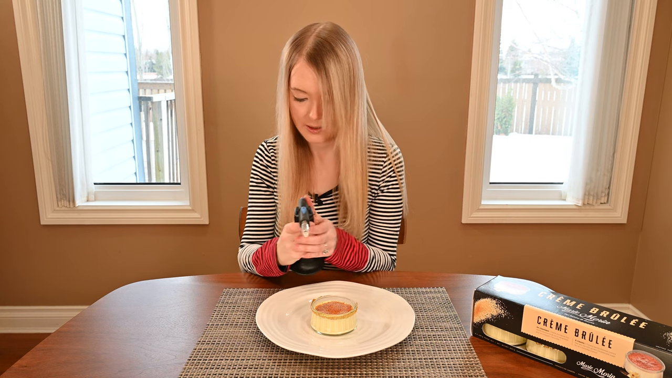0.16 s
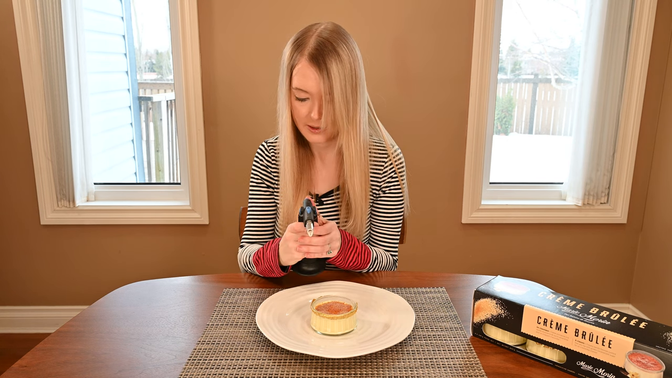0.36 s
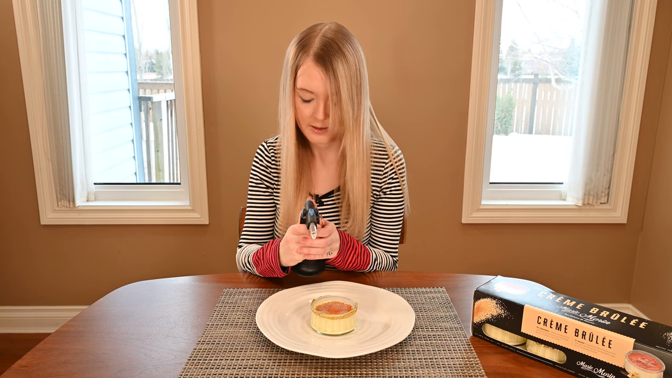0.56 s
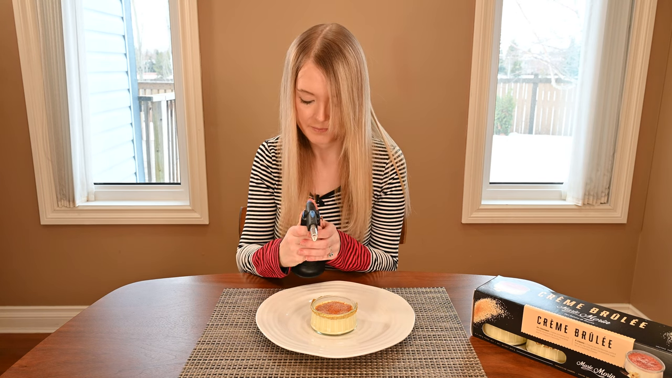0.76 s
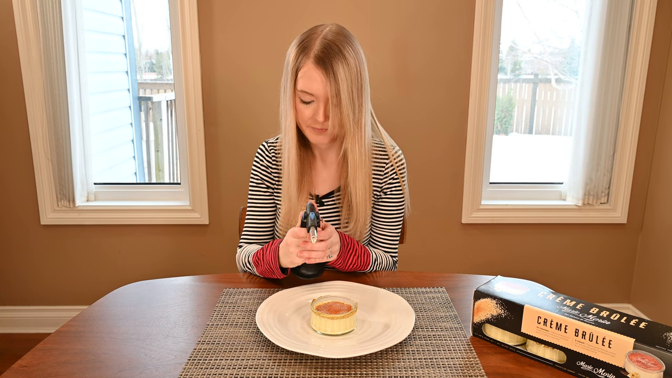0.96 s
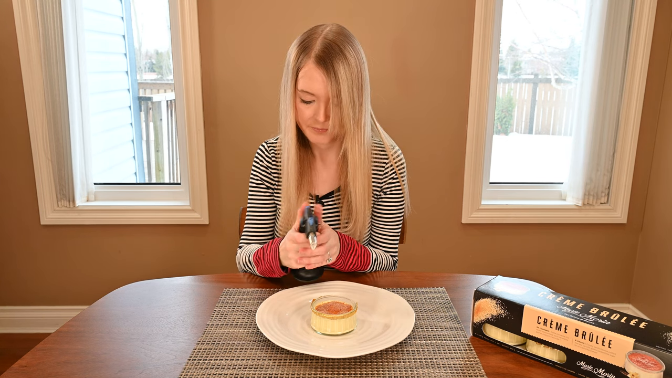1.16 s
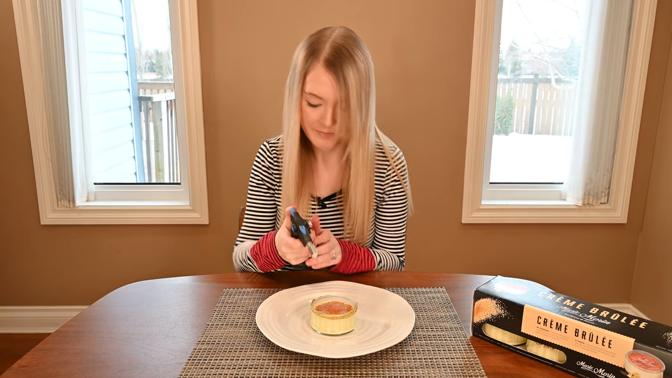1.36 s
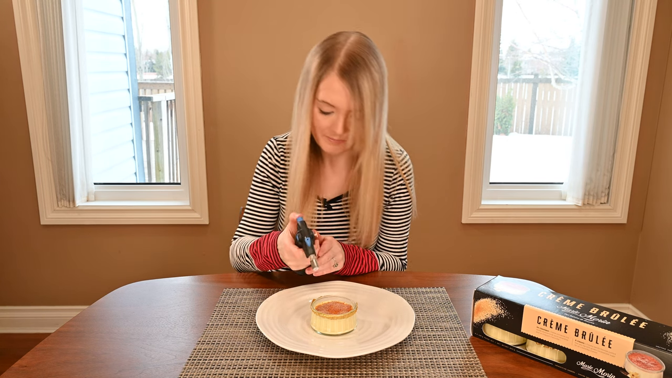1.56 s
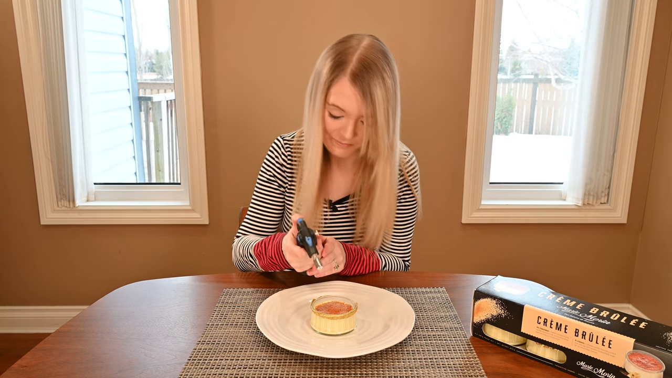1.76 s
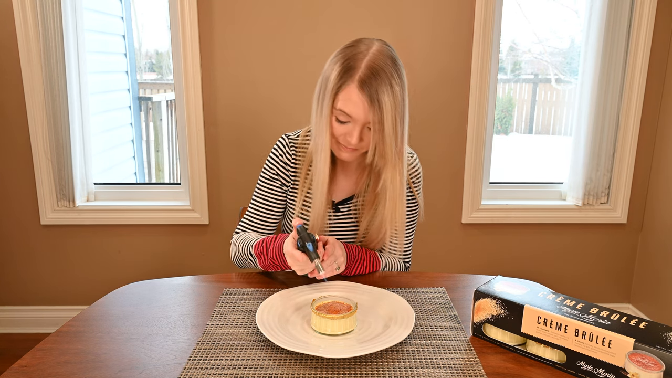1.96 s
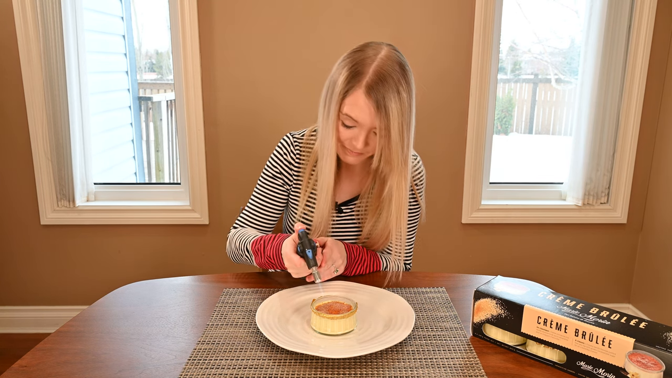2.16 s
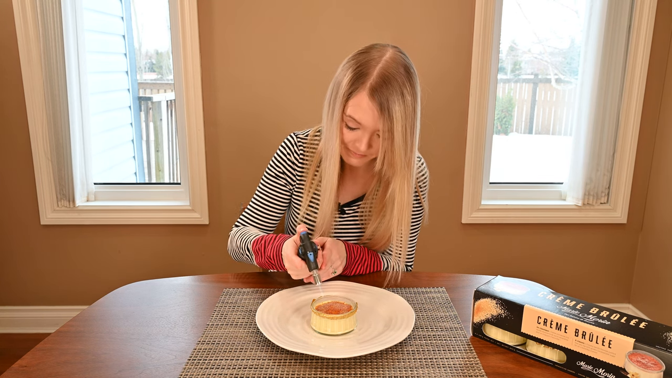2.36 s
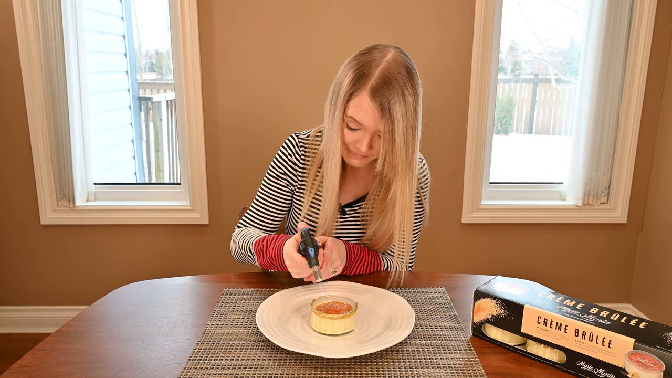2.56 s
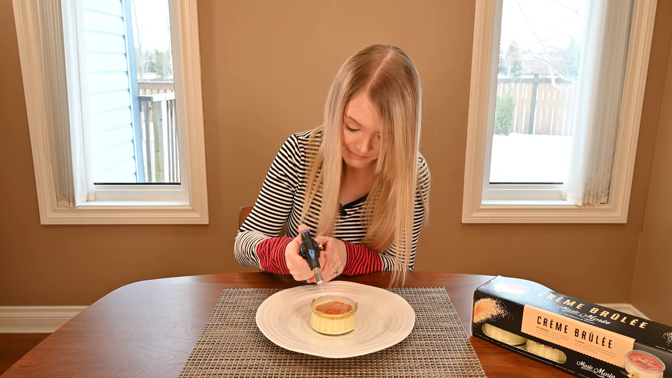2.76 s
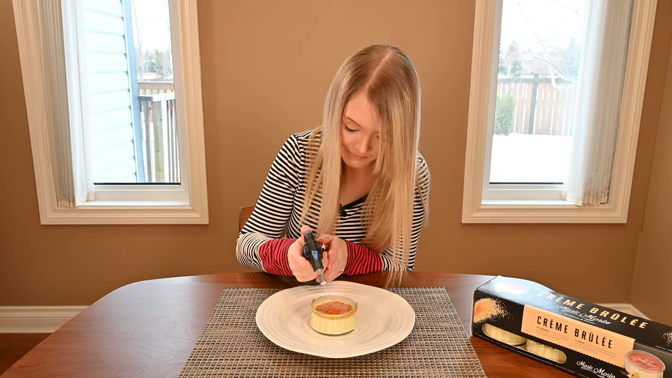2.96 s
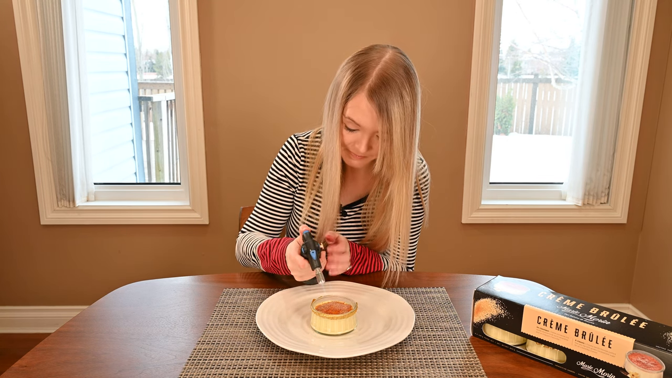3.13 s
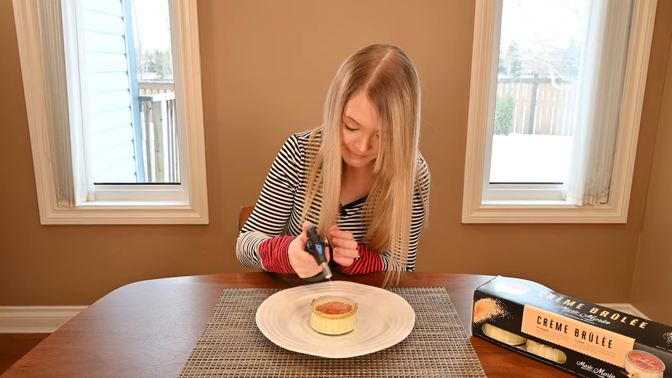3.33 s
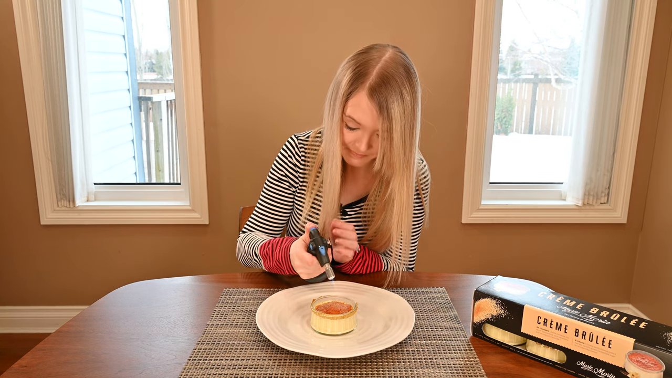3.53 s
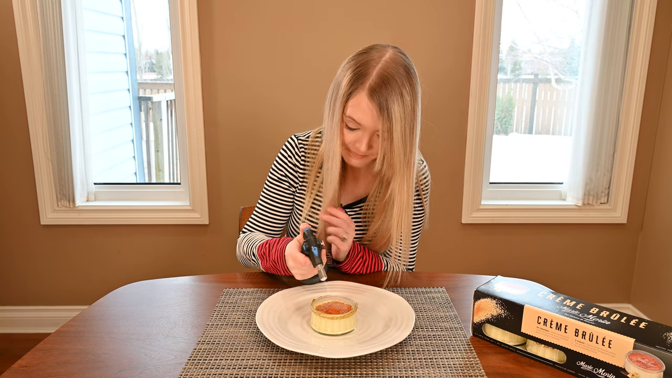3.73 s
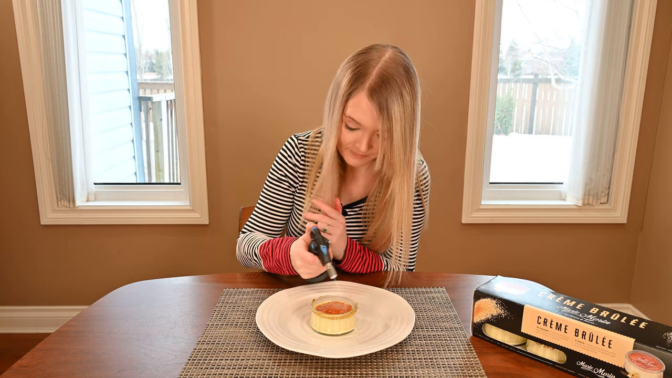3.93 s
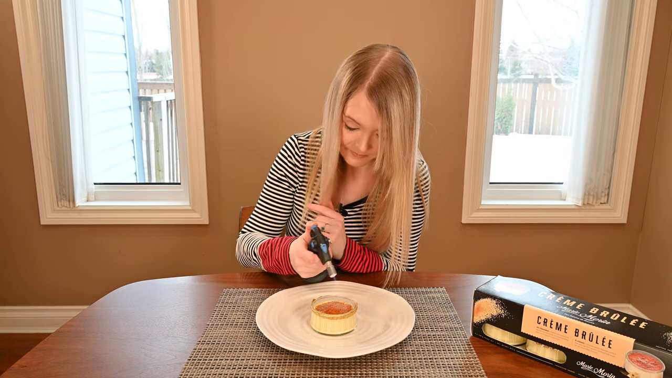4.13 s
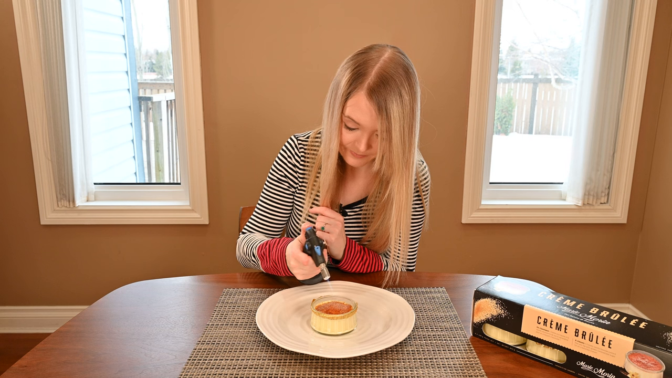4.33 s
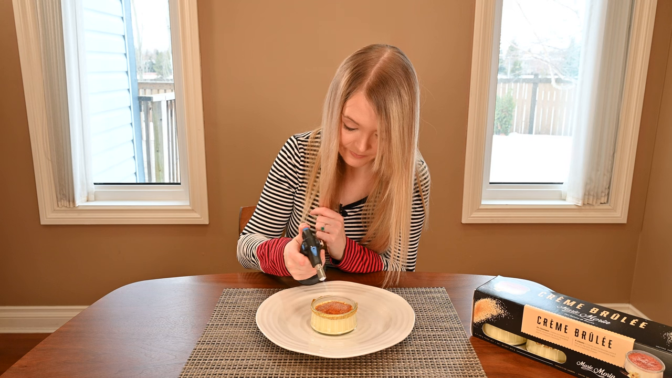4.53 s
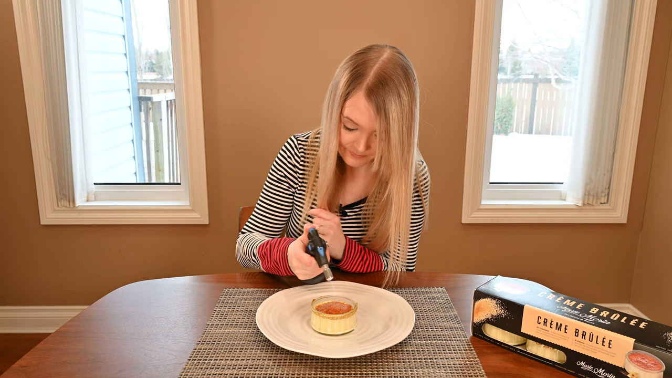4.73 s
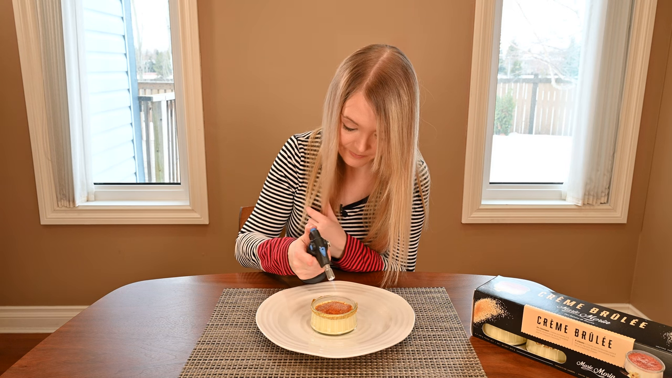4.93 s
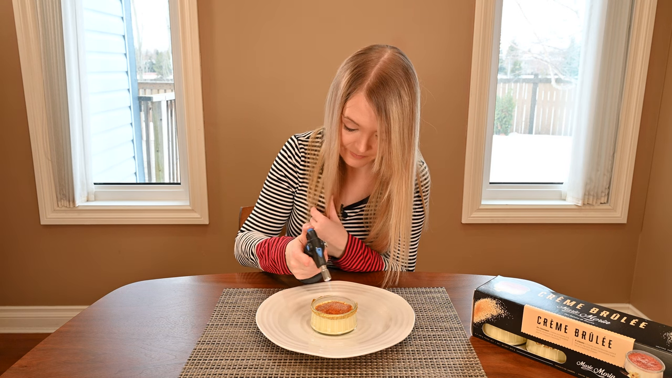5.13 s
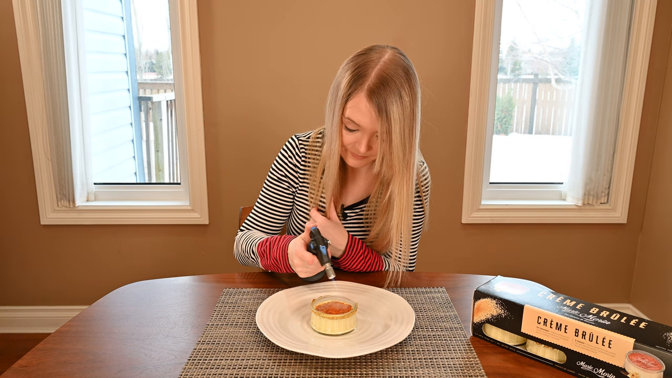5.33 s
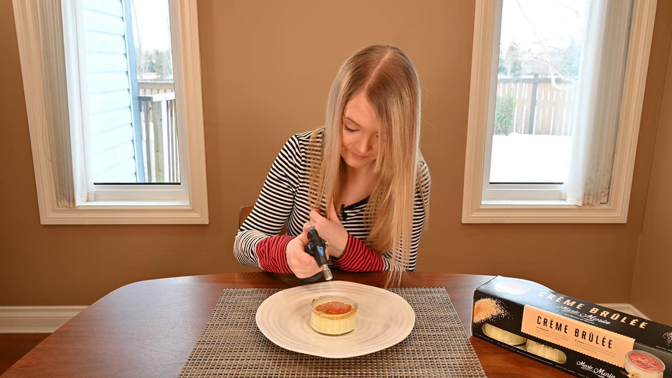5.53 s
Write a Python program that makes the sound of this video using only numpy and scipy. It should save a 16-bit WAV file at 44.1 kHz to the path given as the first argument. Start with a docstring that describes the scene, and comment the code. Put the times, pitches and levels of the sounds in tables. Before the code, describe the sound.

Faint handling, then a small gas torch hisses, clicks sharply alight and burns with a soft, steady hiss and roar.

```python
"""A hand-held butane torch is lit at a dining table, heard through a clip-on microphone.
First, over a faint room hum, fingers rub, creak and knock on the plastic body. At 1.7 s the valve opens
and gas hisses through the nozzle. The piezo igniter snaps twice and the gas catches with a low pop.
The flame then roars softly under the hiss, which shifts as the torch moves.
From 4.2 s hair brushes near the microphone, and near the end the flame flares once."""
import sys
import numpy as np
from scipy import signal
from scipy.fft import rfft, irfft
from scipy.io import wavfile
from scipy.ndimage import uniform_filter1d, map_coordinates

SR = 44100
rng = np.random.default_rng(int(sys.argv[2]) if len(sys.argv) > 2 else 0)


def materialize(psi):
    """Save the field psi as 16-bit PCM at rate SR to the path in sys.argv[1].

    A 1-D psi becomes a single channel; in a 2-D psi each row is a channel.
    """
    bounded = np.clip(np.atleast_2d(psi).T, -1, 1)
    quanta = np.round(bounded * 32767).astype(np.int16)
    wavfile.write(sys.argv[1], SR, quanta)


N = 246737
TIME, HZ = np.arange(N) / SR, np.fft.rfftfreq(N, 1 / SR)
VALVE_S, VALVE_RISE_S = 1.71, 0.076  # when the valve opens, and how long the flow takes to build
LIT_S, CATCH_S = 1.872, 0.018  # when the gas lights, and how long the flame takes to catch

# The tone colours of the noises. Each row: frequency in Hz, relative level in dB.
AIR_SPECTRUM = [(15, -51), (25, -24), (86, -20), (122, -4), (178, -15.5), (233, -11.5), (267, -12),
                (389, -13.5), (421, -22), (509, -13.5), (598, -25.5), (9550, -36.5), (15500, -39.5)]  # still air in the room
RUB_SPECTRUM = [(150, 2.5), (400, 2), (900, -1.5), (1450, 0), (2400, -11), (4500, -12.5), (9000, -16),
                (15000, -24.5)]  # sliding skin and cloth
KNOCK_SPECTRUM = [(150, -32), (450, -18.5), (900, -5.5), (1700, 1.5), (2600, -1.5), (4500, 1.5),
                  (7500, -5.5), (8900, -5.5), (11500, -10), (16000, -19)]  # short knocks and scuffs
JET_SPECTRUM = [(1500, -17.5), (2700, 4), (3300, -6), (5400, -5), (6300, 4.5), (7100, -8), (9400, -9.5),
                (12200, -5), (13200, 7), (14000, 2), (14700, 0.5), (15700, 1.5), (16300, -2)]  # the fine hiss of the gas
ROAR_SPECTRUM = [(50, -22), (80, -24), (120, -15), (200, -9), (260, -3.5), (450, 0.5), (760, -1),
                 (900, -4.5), (1100, -6.5), (1380, -8), (1680, -19), (1950, -17.5), (2300, -27.5),
                 (5000, -54)]  # the flame
CRACK_SPECTRUM = [(150, -26), (700, -8), (1200, -1), (2700, 1), (5500, 0.5), (7200, -2), (9500, 1),
                  (13000, -1), (16000, -11)]  # metal hitting metal
HAIR_SPECTRUM = [(500, -24), (2500, 1), (5000, -3), (8000, -3), (10000, 6), (12000, 0), (13500, -1),
                 (16000, -5)]  # brushing hair
# The hum of an appliance. Each row: frequency in Hz, level in dB.
HUM_TONES = [(120, -82), (242, -82.5), (388, -87.5), (511, -82)]
# Fingers and sleeves stroking the torch. Each row: start in seconds, length in seconds, level in dB.
RUB_STROKES = [(0, .16, -75.5), (0.162, 0.23, -70.5), (0.441, .13, -73.5), (1.054, 0.17, -74.5),
               (1.209, .26, -68), (1.58, .07, -75), (1.67, 0.087, -73)]
# Resonances of the plastic handle. Each row: frequency in Hz, half-width in Hz, relative level in dB.
GRIP_RESONANCES = [(1000, 200, -8), (1780, 230, 4), (2760, 130, -1), (3270, 200, -10), (4250, 130, -3),
                   (4800, 140, -2), (7000, 3700, -21), (8550, 260, -16)]
# Soft bumps of the arms. Each row: start in seconds, level in dB, fade time in seconds.
ARM_BUMPS = [(0.315, -56.5, 0.024), (4.803, -55, 0.018), (4.878, -55.5, .04), (4.968, -54.5, .015),
             (5.258, -57.5, 0.037)]
# Short knocks and scuffs: early ones on the torch, the last two hair near the microphone.
# Each row: start in seconds, level in dB, contact time in seconds, treble tilt in dB per octave.
KNOCKS_AND_SCUFFS = [(.508, -63, .004, 1), (0.647, -59.5, 0.0028, -5), (1.356, -59.5, .003, 3),
                     (1.408, -58.5, 0.0055, 7), (1.58, -60, 0.016, -7), (1.676, -60.5, .005, -2.5),
                     (1.7083, -29, 0.0018, -0.5), (1.7211, -40, 0.0018, -6), (1.8294, -23.5, .0005, 1.5),
                     (4.89, -57, .025, -7), (5.018, -48, .006, 2)]
# The nozzle tube's three rings, one list of resonances each.
# Each row: frequency in Hz, half-width in Hz, relative level in dB.
NOZZLE_RINGS = [
    [(4195, 253, -6.5), (4623, 384, 0.5), (4710, 220, -2)],
    [(7830, 680, 0)],
    [(11030, 850, 0)],
]
# The jet beams its sound, so its level changes as the torch turns.
# Each row: time in seconds, treble level in dB, level of the first ring in dB.
JET_BEAM = [(2.15, -69.5, -57), (2.34, -70.5, -57.5), (2.79, -68, -57), (3.17, -70.5, -58),
            (3.48, -73, -57.5), (3.83, -71.5, -58), (4.72, -68.5, -58), (5.21, -64, -54.5),
            (5.55, -65, -54.5)]
# The second and third rings. Each row: level in dB, share of the treble's swing that it follows.
UPPER_RING_LEVELS = [(-70, 0.49), (-72.5, 0.74)]
# Brief swells of the second ring. Each row: middle in seconds, length in seconds, lift in dB.
RING_SWELLS = [(2.45, 0.21, 6), (5.17, .18, 4)]
# The nozzle's movement. Each row: time in seconds, distance moved in metres.
NOZZLE_TRAVEL = [(1.7, 0), (2, 0.013), (2.3, 0.049), (2.9, 0.054), (3.3, 0.06), (3.9, .14), (4.3, 0.171),
                 (4.9, 0.19), (5.59, 0.14)]
# Echoes off plate, table and body. Each row: extra path in metres, its change per metre moved.
NEAR_SURFACES = [(.21, 0.826), (0.372, -0.617), (.58, 1.1), (.86, -0.876)]
# The room's standing waves. Each row: frequency in Hz, width in Hz, lift in dB.
STANDING_WAVES = [(129, 17, 4.5), (175, 23, 4), (246, 17, 4), (428, 13, 3.5), (569.5, 21, 4.5),
                  (706, 14, 5), (748, 6, 4), (1246, 12, 2)]
# Ringing tones. Each row: frequency in Hz, relative level in dB, seconds to fade by 60 dB.
LATCH_MODES = [(1370, -19.5, 0.02), (1960, -13.5, 0.013), (3410, -11, 0.016), (4100, -15, 0.025),
               (4830, 2.5, 0.0058), (5580, -3, 0.01), (8300, 0, .006), (11800, 0, 0.0038),
               (13800, -13, .006), (15400, -8.5, .006)]  # the igniter's latch
HAMMER_MODES = [(1340, -3.5, 0.018), (1970, -15.5, 0.012), (2740, -13, 0.0074), (3295, -4, 0.025),
                (3850, 1, 0.0079), (5700, 2.5, 0.0076), (7970, -8, 0.0094), (8800, 1, 0.0081),
                (9400, -5, .008), (10520, 3.5, 0.0051), (12000, 4, 0.0058), (13050, 4.5, 0.0068),
                (14700, 2, 0.0086), (16000, -7, .007)]  # its hammer striking the crystal
POP_MODES = [(134, -3, 0.043), (347, 1, 0.025), (445, -2, 0.037), (830, -11, 0.023), (1340, -2, .02)]  # the gas catching
# The igniter's echoes off table and wall. Each row: delay in seconds, relative level in dB.
CLICK_ECHOES = [(.0078, -23), (.0188, -28)]
# Brushes of hair. Each row: start in seconds, relative level in dB, fade time in seconds.
HAIR_BRUSHES = [(4.206, -53, 0.0054), (4.618, -50, .005), (4.63, -55, .015), (4.667, -54.5, 0.018),
                (4.747, -56, 0.016), (4.755, -44, 0.0021), (4.787, -54.5, .015), (4.96, -51.5, 0.018),
                (5.005, -55, .015), (5.261, -54, .007), (5.306, -56, .006)]
# How long the room rings. Each row: frequency in Hz, seconds to fade by 60 dB.
ROOM_DECAY = [(150, .3), (1400, 0.69), (4000, 0.32), (9000, 0.35), (15000, 0.21)]
# How far the right channel trails the left. Each row: frequency in Hz, phase lag in radians.
RIGHT_PHASE_LAG = [(1500, 0), (2600, .05), (4400, .1), (8000, .22), (14000, .45)]


def amp(db):
    """Turns decibels into a factor to multiply by."""
    return 10 ** (np.asarray(db) / 20)


def unit(x):
    """Scales a signal to an average power of 1."""
    return x / np.sqrt(np.mean(x ** 2) + 1e-20)


def curve(points, hz=HZ):
    """Joins a table's points with straight lines on a log-frequency axis."""
    point_hz, value = np.transpose(points)
    return np.interp(np.log(hz + 1), np.log(point_hz + 1), value)


def shaped(x, gain):
    """Colours a sound; white noise would keep its power."""
    return irfft(rfft(x) * unit(gain), N)


def noise(gain):
    """Noise of power 1, coloured by a gain for each frequency."""
    return unit(shaped(rng.standard_normal(N), gain))


def drift(rate_hz):
    """A smooth random wobble, about 1 in size."""
    return noise(np.exp(-(HZ / rate_hz) ** 2))


def humps(resonances):
    """The gain at each frequency of steep-sided resonances."""
    return np.sqrt(sum((amp(db) / (1 + ((HZ - hz) / width) ** 2)) ** 2 for hz, width, db in resonances))


def ramp(start, length):
    """Rises from 0 to 1 and stays there."""
    return np.clip((TIME - start) / length, 0, 1)


def burst(start, fade, rise):
    """A level that rises quickly, then dies away."""
    age = np.maximum(TIME - start, 0)
    return (1 - np.exp(-age / rise)) * np.exp(-np.minimum(age / fade, 100))


def swell(middle, length):
    """A smooth rise to 1 and back."""
    return np.exp(-(2 * (TIME - middle) / length) ** 2)


def ring(start, modes, rise):
    """Tones that start together and die away; neighbours swing in opposite directions."""
    t = np.arange(SR // 10) / SR
    tones = sum((-1) ** k * amp(db - 60 * t / t60) * np.sin(2 * np.pi * hz * t)
                for k, (hz, db, t60) in enumerate(modes))
    out = np.zeros(N)
    out[round(start * SR):][:len(t)] = tones * (1 - np.exp(-(t / rise) ** 2))
    return out


def delayed(x, seconds):
    """A sound heard later, by a steady or moving delay."""
    return map_coordinates(x, [(TIME - seconds) * SR], order=3)


def room_tone():
    """Still air and the slightly wavering hum of an appliance."""
    hum = sum(amp(db) * np.sqrt(2) * np.sin(2 * np.pi * hz * TIME + 0.3 * drift(4))
              for hz, db in HUM_TONES)
    return amp(-71.96) * noise(amp(curve(AIR_SPECTRUM))) + hum


def rubbing():
    """Skin and cloth rub in grainy strokes until the grip settles on the lit torch."""
    pressure = amp(-82.5) * (TIME < VALVE_S)  # even a resting grip rustles
    for start, length, db in RUB_STROKES:
        release = np.exp(-np.maximum(TIME - start - length, 0) / 0.0226)
        pressure = np.hypot(pressure, amp(db) * ramp(start, 0.023) * release)
    grain = amp(2 * drift(82))
    return pressure * grain * noise(amp(curve(RUB_SPECTRUM)))


def grip_creak():
    """The plastic handle creaks once as the fingers close on it."""
    return amp(-39.5) * burst(0.1264, fade=0.0051, rise=0.0017) * noise(humps(GRIP_RESONANCES))


def arm_bumps():
    """Dull thumps reach the microphone through clothing."""
    level = sum(amp(db) * burst(start, fade, fade / 3) for start, db, fade in ARM_BUMPS)
    return level * noise(humps([(136, 44, 0)]))


def knocks_and_scuffs():
    """Short contacts make bursts of noise: first on the torch, the last two hair near the microphone."""
    octaves = np.log2(np.maximum(HZ, 1000) / 4000)
    colour_db = curve(KNOCK_SPECTRUM)
    return sum(amp(db) * burst(start, contact, contact / 3) * noise(amp(colour_db + tilt * octaves))
               for start, db, contact, tilt in KNOCKS_AND_SCUFFS)


def gas_jet():
    """Gas hisses out once the valve opens, and the nozzle tube rings with it."""
    times, treble_db, first_db = np.transpose(JET_BEAM)
    swing_db = np.interp(TIME, times, treble_db) + 70  # how far the treble is from its usual -70 dB
    first = amp(np.interp(TIME, times, first_db)) * noise(humps(NOZZLE_RINGS[0]))
    second, third = (amp(db + share * swing_db) * noise(humps(resonances))
                     for (db, share), resonances in zip(UPPER_RING_LEVELS, NOZZLE_RINGS[1:]))
    second *= amp(sum(db * swell(middle, length) for middle, length, db in RING_SWELLS))
    hiss = burner_warming(noise(amp(curve(JET_SPECTRUM))))
    hiss = amp(-66 + 0.71 * swing_db) * near_echoes(hiss)
    treble_gain = amp(-6.5 * (1 - ramp(LIT_S, CATCH_S)))  # the unlit jet is duller
    jet = hand_shadow(first + treble_gain * (second + third + hiss))
    return jet * ramp(VALVE_S, VALVE_RISE_S) * amp(0.5 * drift(150))


def burner_warming(hiss):
    """The hiss starts low and glides up as the burner warms; its pitch also wanders a little."""
    coldness = np.exp(-np.maximum(TIME - LIT_S, 0) / 0.22)
    speed = 1 - 0.22 * coldness + 0.016 * drift(1.6)
    return map_coordinates(hiss, [np.cumsum(speed)], order=5, mode="mirror")


def near_echoes(hiss, metres_per_second=343):
    """Nearby surfaces add echoes whose delays slide as the torch moves, shifting the hiss's colour."""
    moved = uniform_filter1d(np.interp(TIME, *np.transpose(NOZZLE_TRAVEL)), SR // 8)
    moved += 0.002 * drift(2)  # the hand is never quite still
    echoes = sum(delayed(hiss, (path + slope * moved) / metres_per_second)
                 for path, slope in NEAR_SURFACES)
    return 0.88 * (hiss + 0.27 * echoes)


def flame_roar():
    """A faint rush of gas becomes a fluttering roar once lit, stirring the room's standing waves."""
    lift_db = sum(db / (1 + (2 * (HZ - hz) / width) ** 2) for hz, width, db in STANDING_WAVES)
    roar = noise(amp(curve(ROAR_SPECTRUM) + lift_db))
    unlit_db = -16 * (1 - ramp(LIT_S, CATCH_S))
    flare_db = 3 * swell(5.28, length=0.074)
    flutter_db = 0.75 * drift(47)
    return roar * ramp(VALVE_S, VALVE_RISE_S) * amp(-51.5 + unlit_db + flare_db + flutter_db)


def snap(start, modes, crack_db, crack_fade, rise):
    """Hard parts collide: a brief crack and quickly dying tones."""
    crack = amp(crack_db) * burst(start, crack_fade, rise) * noise(amp(curve(CRACK_SPECTRUM)))
    return crack + amp(-12.5) * ring(start, modes, rise)


def igniter():
    """The latch slips, then the sprung hammer hits the crystal; table and wall throw both back."""
    latch = snap(1.8402, LATCH_MODES, crack_db=-20, crack_fade=0.001, rise=0.0003)
    hammer = snap(1.8729, HAMMER_MODES, crack_db=-7.5, crack_fade=0.0011, rise=0.00029)
    clicks = latch + hammer
    return clicks + sum(amp(db) * delayed(clicks, delay) for delay, db in CLICK_ECHOES)


def gas_pop():
    """The gas catches with a low pop."""
    return amp(-32) * ring(1.8842, POP_MODES, rise=0.0007)


def hand_shadow(jet, middle_s=3.55, length_s=0.47, dip_db=-7):
    """One band of the treble fades for a moment while the free hand is lifted."""
    band = irfft(rfft(jet) * np.exp(-((HZ - 11100) / 900) ** 2), N)
    cover = np.exp(-(2 * (TIME - middle_s) / length_s) ** 4)
    return jet + (amp(dip_db * cover) - 1) * band


def hair(slips_per_second=1200):
    """Each brush of hair is a clump of tiny sharp slips."""
    pressure = sum(amp(db) * burst(start, fade, fade / 5) for start, db, fade in HAIR_BRUSHES)
    slips = rng.standard_normal(N) * (rng.random(N) < slips_per_second / SR)
    return amp(2) * shaped(unit(slips) * pressure, amp(curve(HAIR_SPECTRUM)))


def room(x, wet_db, delay_s=0.0061):
    """Adds scattered echoes from table and walls; the highest treble dies first."""
    echoes = rng.choice([-1., 1.], SR // 2) * (rng.random(SR // 2) < 5000 / SR)
    hz, t, spectra = signal.stft(echoes, SR, nperseg=256)
    decay = amp(-60 * t / curve(ROOM_DECAY, hz)[:, None])
    tail = signal.istft(spectra * decay, SR)[1]
    tail = np.pad(tail / np.linalg.norm(tail), (round(delay_s * SR), 0))
    return x + amp(wet_db) * signal.fftconvolve(x, tail)[:N]


def scene():
    """Torch, hands, hair and room reach one microphone, which feeds both channels."""
    torch = room(igniter(), wet_db=-14.5) + room(gas_jet() + flame_roar() + gas_pop(), wet_db=-12)
    touches = room(knocks_and_scuffs() + grip_creak(), wet_db=-10.5) + rubbing() + arm_bumps() + hair()
    low_cut = signal.butter(4, 70, "highpass", fs=SR, output="sos")  # the microphone loses deep bass
    mono = signal.sosfilt(low_cut, torch + touches) + room_tone()
    return np.array([mono, mono])


def record(dry):
    """A slight overload rounds the snap, the right channel's treble lags a trace, and the top is cut."""
    rounded = np.tanh(dry)
    lag = np.array([[0], [1]]) * curve(RIGHT_PHASE_LAG)
    pair = irfft(rfft(rounded) * np.exp(-1j * lag), N)
    high_cut = signal.firwin(901, 15880, window=("kaiser", 8), fs=SR)
    return signal.oaconvolve(pair, high_cut[None], "same")


dry = scene()
out = record(dry)
materialize(out)
```